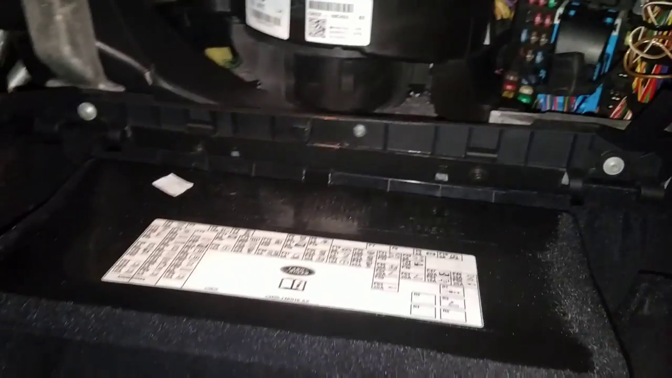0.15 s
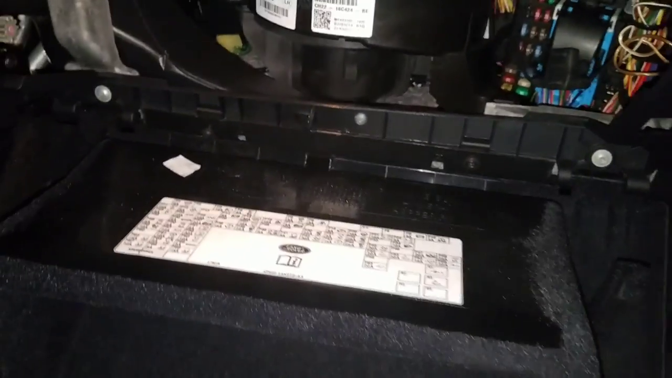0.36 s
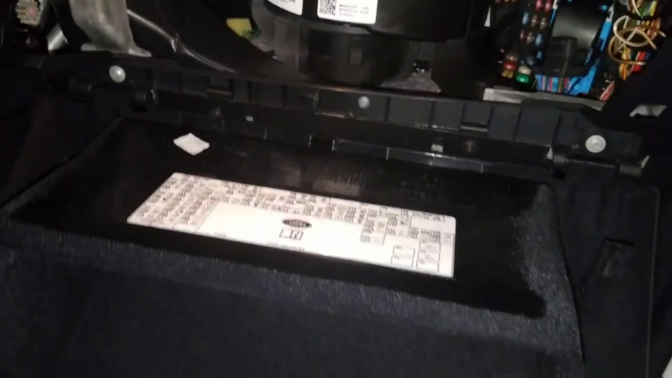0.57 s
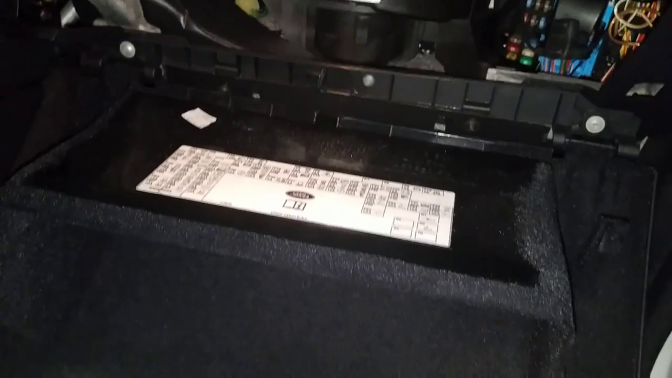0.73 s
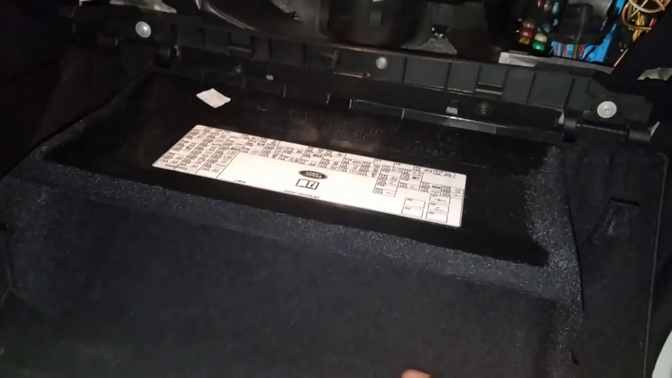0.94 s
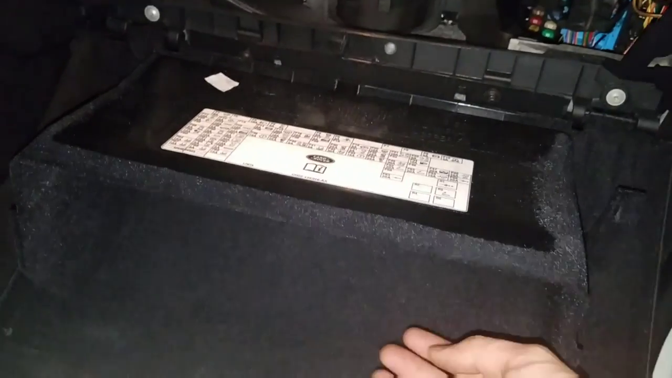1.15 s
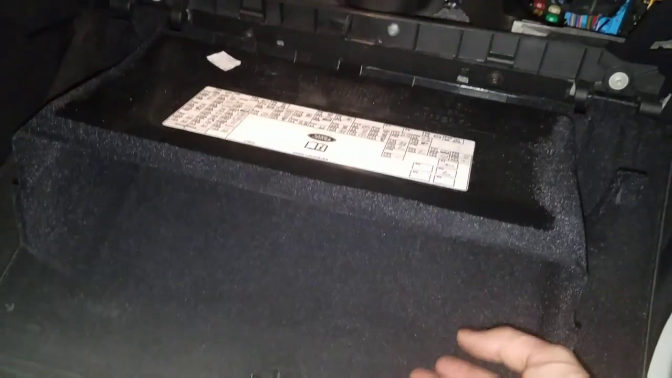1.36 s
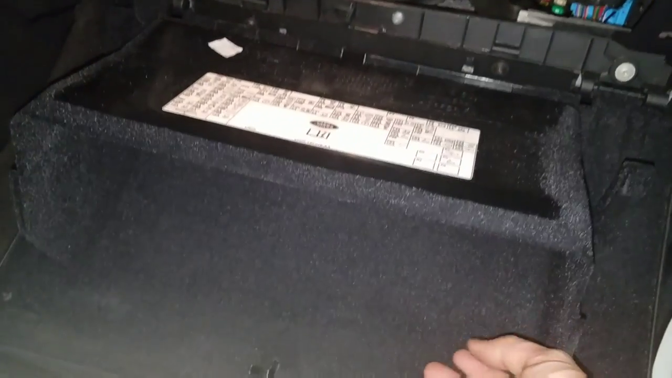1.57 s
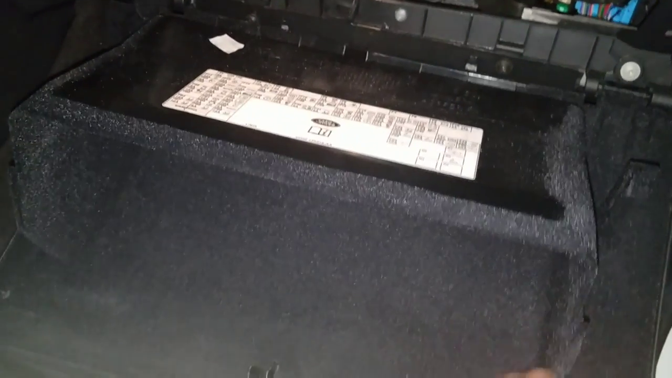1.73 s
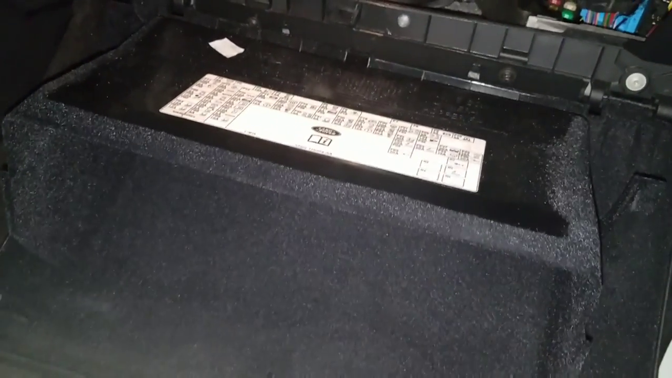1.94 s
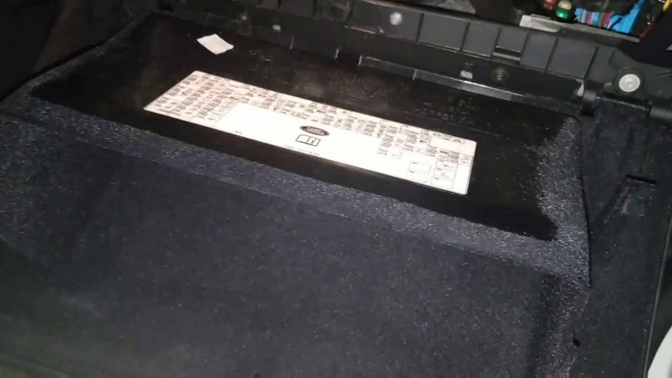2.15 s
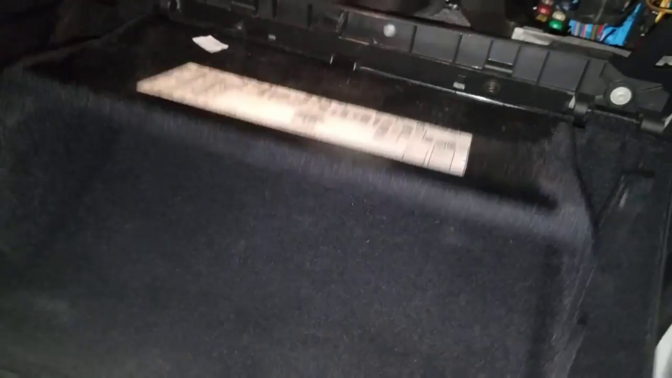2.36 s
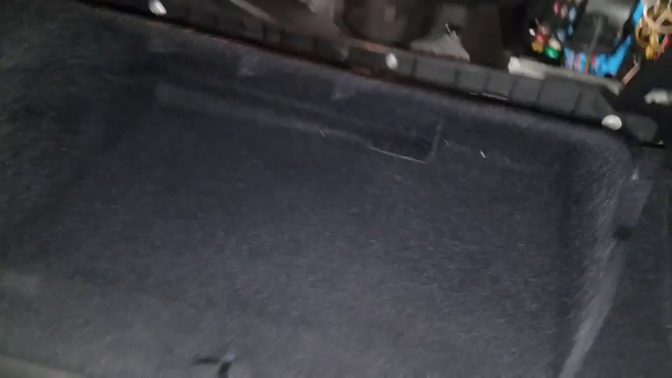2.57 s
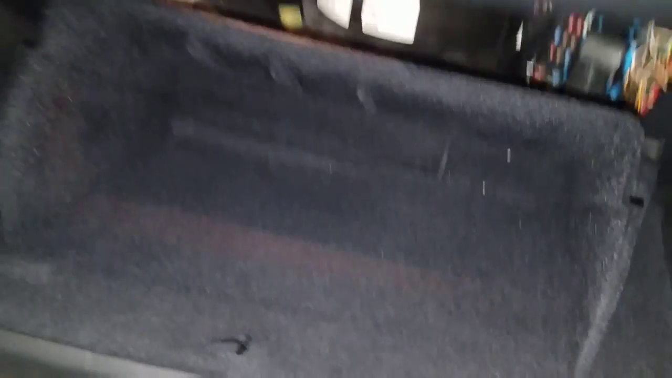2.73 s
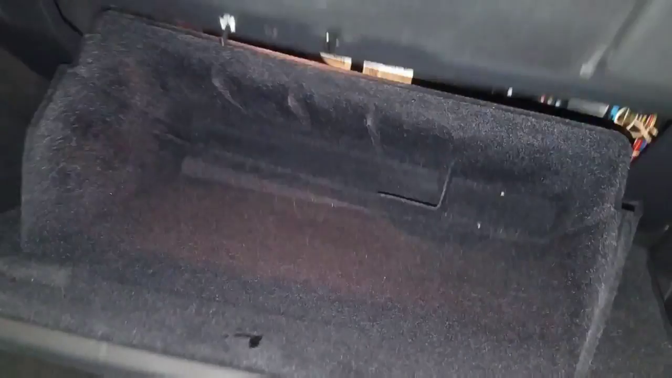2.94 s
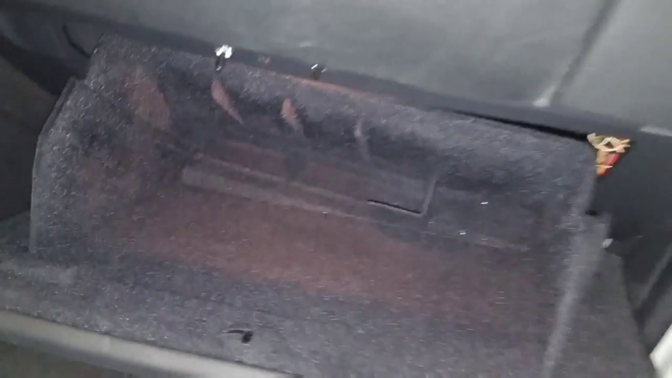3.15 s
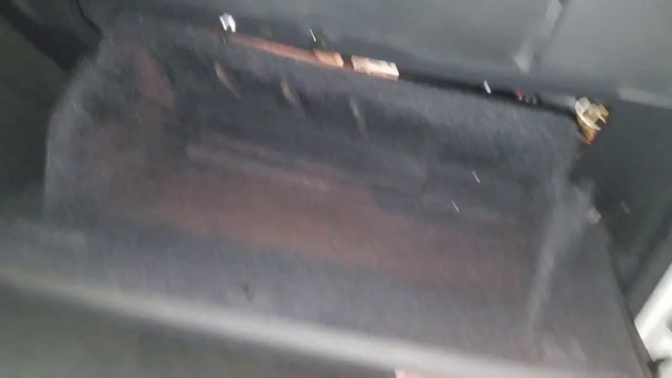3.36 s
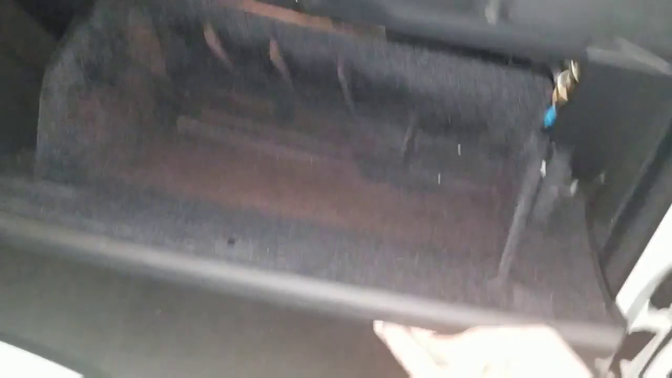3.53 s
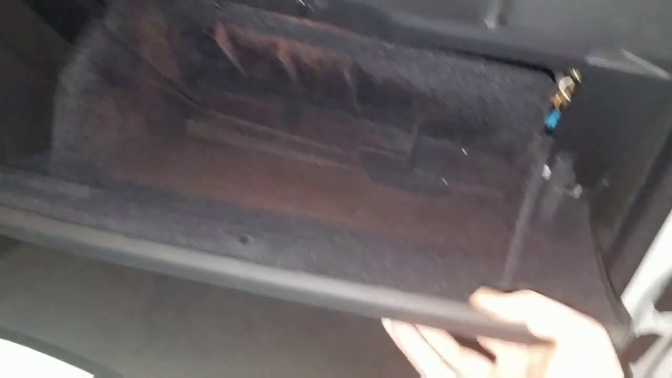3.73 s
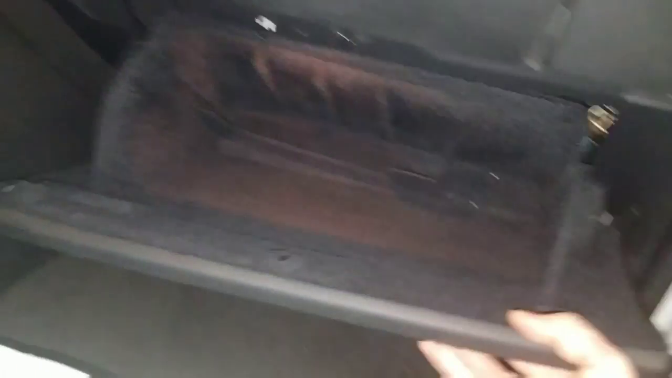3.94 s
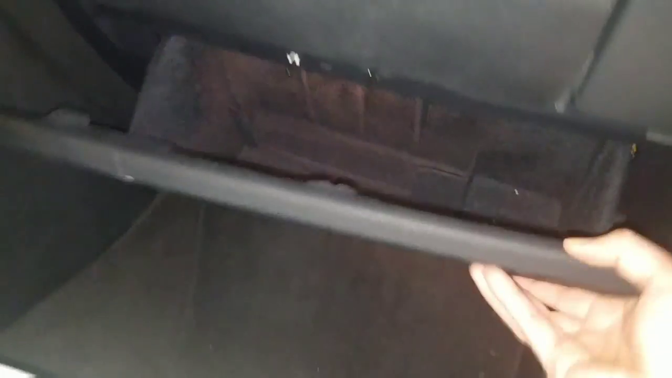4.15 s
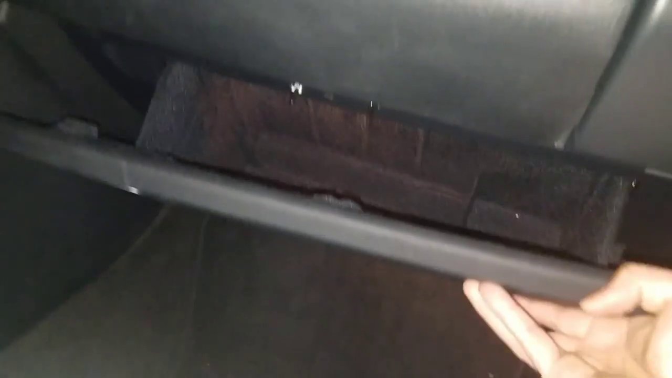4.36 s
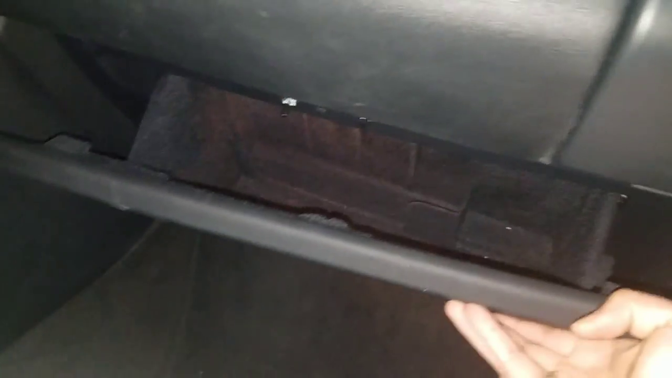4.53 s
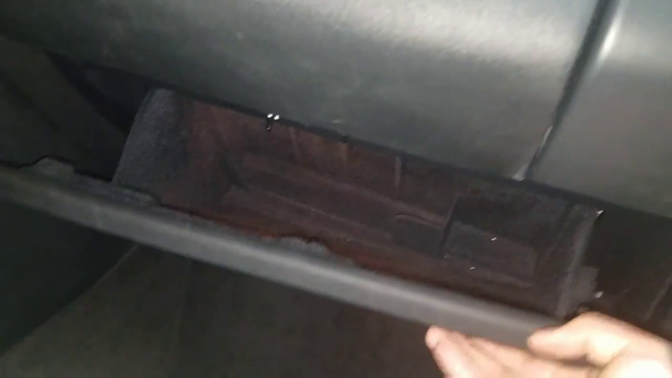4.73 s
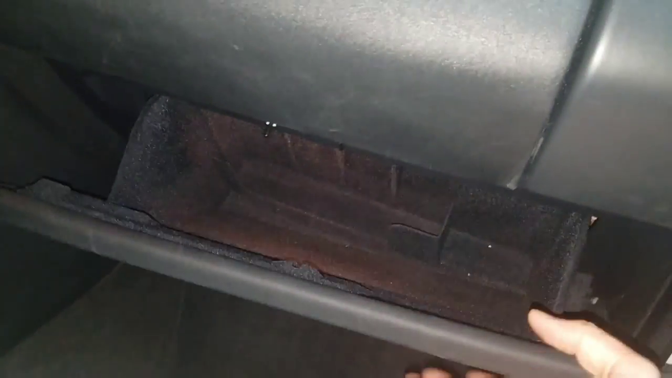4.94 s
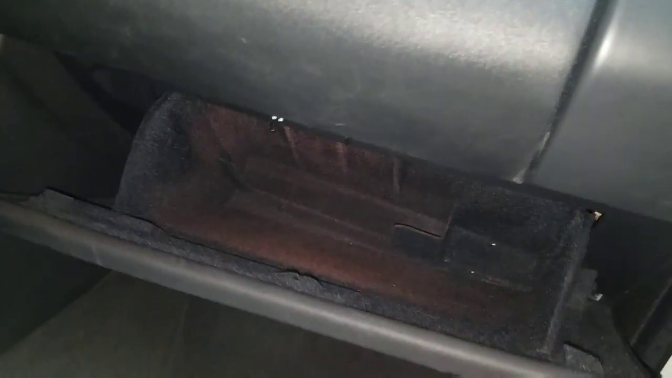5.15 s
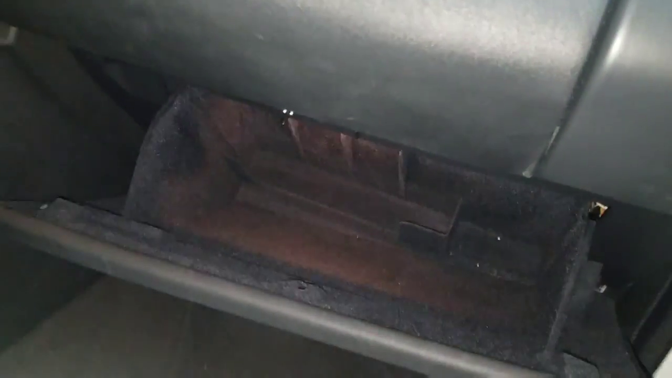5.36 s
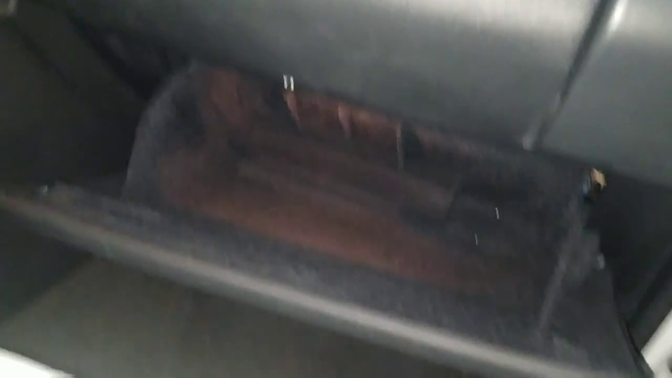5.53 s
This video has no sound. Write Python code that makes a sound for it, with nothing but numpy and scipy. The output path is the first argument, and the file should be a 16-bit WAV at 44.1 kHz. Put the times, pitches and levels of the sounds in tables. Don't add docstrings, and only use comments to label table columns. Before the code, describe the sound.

A sleeve brushes in grainy bursts for two seconds over faint air and hiss. A glove box bin is swung up: dull bumps, a sharp hollow knock, booming felt rubs, then quick thuds and a very loud plastic crack past its stops, with a short frame hum. The nearby microphone flattens and ducks the cabin air. Afterwards come a tiny tick, soft sliding and a last nudge.

```python
import sys
import numpy as np
from scipy import signal
from scipy.fft import rfft, irfft, next_fast_len
from scipy.io import wavfile
from scipy.ndimage import uniform_filter1d

SR = 44100
rng = np.random.default_rng(int(sys.argv[2]) if len(sys.argv) > 2 else 0)


def magnitude_from_level(level_db):
    exponent = np.asarray(level_db, float) / 20
    return 10 ** exponent


def materialize(psi):
    bounded = np.clip(np.atleast_2d(psi).T, -1, 1)
    quanta = np.round(bounded * 32767).astype(np.int16)
    wavfile.write(sys.argv[1], SR, quanta)


N = 251059
TIME_S = np.arange(N) / SR

# mode_hz, level_db, t60_s
BIN_MODES = [(180, -7, .27), (273, 1, .22), (305, -1, .15), (369, -10, .2), (439, -4, .12), (533, -12, .09),
             (707, -4, .14), (777, -11, .14), (853, -15, .13), (930, -21, .12), (1290, -17, .14),
             (1529, -16, .16), (1880, -15, .12), (1956, -17, .14), (2257, -14, .14)]
# freq_hz, correlation
NEAR_LIKENESS = [(60, .995), (150, .99), (300, .93), (640, .7), (1400, .1), (3000, 0)]
# freq_hz, correlation
FAR_LIKENESS = [(60, .93), (150, .6), (380, .36), (950, .03), (1400, 0.0)]
# start_s, knock_db, thud_re_knock_db, snap_re_knock_db, pitch_hz, ring_re_60ms_db
SLAM_BLOWS = [
    (4.1655, 2.5, -13, -13.5, 2150, 2),
    (4.191, -20, 8, -19, 719, 5),
]


def unit(x):
    return x / np.sqrt(np.mean(x ** 2) + 1e-20)


def along(points, hz):
    point_hz, value = np.transpose(points)
    return np.interp(np.log(hz + 1), np.log(point_hz + 1), value)


def timed(points):
    return np.interp(TIME_S, *np.transpose(points))


def strokes(rows):
    peak_s, peak_db, rise_s, fall_s = np.transpose(rows)[:4, :, None]
    late_s = TIME_S - peak_s
    return peak_db - 20 * np.maximum(-late_s / rise_s, late_s / fall_s)


def summed(db):
    return uniform_filter1d(np.sqrt(np.sum(magnitude_from_level(2 * db), axis=0)), size=221)


def filtered(x, response):
    count = x.shape[-1]
    size = next_fast_len(count + SR // 2)
    spectrum = rfft(x, size) * response(np.fft.rfftfreq(size, 1 / SR))
    return irfft(spectrum, size)[..., :count]


def registers(hz):
    deep, low, high = [1 / (1 + (hz / edge_hz) ** 10) for edge_hz in (110, 500, 2800)]
    return low - deep, high - low, 1 - high, deep


def bump(hz, centre_hz, width, db):
    return magnitude_from_level(db / (1 + (np.log((hz + 1) / centre_hz) / width) ** 2))


def bandpass(hz, centre_hz, width_hz):
    loss = 1j * hz * width_hz
    return loss / (centre_hz * centre_hz - hz * hz + loss)


def pair(two, spectrum, alike):
    def mid_side(hz):
        turn = np.arccos(np.clip(along(alike, hz), -1, 1)) / 2
        return magnitude_from_level(along(spectrum, hz)) * [np.cos(turn), np.sin(turn)]

    mid, side = filtered(two, mid_side)
    return np.array([mid + side, mid - side])


def patchy(depth_db, pitch_hz=1000 + np.zeros(N), width=.15, peak_db=0):
    hz, frame_s, z = signal.stft(rng.standard_normal((2, N)), SR, nperseg=512)
    field = uniform_filter1d(rng.standard_normal(z.shape[1:]), size=4, axis=0)
    field = uniform_filter1d(field, size=6, axis=1)
    peak = bump(hz[:, None], np.interp(frame_s, TIME_S, pitch_hz), width, peak_db)
    return signal.istft(z * peak * magnitude_from_level(depth_db * unit(field)), nperseg=512)[1][:, :N]


def grit(rate_hz, spread_db, life_s):
    slips = (rng.random(N) < rate_hz / SR) * magnitude_from_level(spread_db * rng.exponential(size=N))
    return 1 + signal.lfilter([1], [1, -np.exp(-1 / (life_s * SR))], slips)


def cabin():
    # freq_hz, level_db_per_hz
    quiet_colour = [(12, -31.5), (20, -2), (27, -21), (44, -9), (64, -2), (125, -5), (195, -15), (300, -10),
                    (370, -17), (825, -22.5), (1400, -23), (8890, -37), (14000, -29.5), (16000, -40.5)]
    quiet_db, stir_db, stir_s, stir_wide_s = -65, 6, 3.5, .25
    sink_s, spring_s, creep_s = .635, .15, .74
    slam_s = SLAM_BLOWS[0][0]
    duck_db = np.interp(TIME_S - slam_s, np.cumsum([0, sink_s, spring_s, creep_s]), [1.5, -13, -3.5, .6])
    stirred_db = stir_db * np.exp(-((TIME_S - stir_s) / stir_wide_s) ** 2)
    air = unit(pair(patchy(depth_db=1.3), quiet_colour, FAR_LIKENESS))
    return magnitude_from_level(quiet_db + np.where(TIME_S > slam_s, duck_db, stirred_db)) * air


def sleeve():
    # peak_s, rustle_db, rise_s, fall_s_per_20db, fizz_re_rustle_db
    rustle_rows = [(.152, -61.5, .13, .03, -5), (.312, -58.5, .09, .05, -7), (.75, -66, .05, .2, -8),
                   (.83, -60, .2, .07, -9), (1.345, -64, .02, .2, -10), (1.39, -62, .12, .06, -8),
                   (1.54, -60, .006, .15, -8), (1.574, -58, .05, .08, -6), (1.665, -59, .03, .2, -5),
                   (1.73, -60, .2, .05, -4), (1.815, -57.5, .12, .1, -2), (1.87, -59, .15, .05, 1),
                   (1.9, -60, .1, .025, -6)]
    # time_s, pitch_hz
    fold_pitch = [(0, 680), (.3, 820), (.8, 940), (1.4, 960), (1.55, 1030), (1.9, 1000)]
    # freq_hz, level_db_per_hz
    cloth_colour = [(120, -43), (340, 1), (1000, -3.5), (2200, -5), (4500, -15), (9000, -20.5),
                    (13000, -16.5), (16500, -21)]
    db = strokes(rustle_rows)
    body_gain = summed(db)
    fizz_gain = summed(db + np.array(rustle_rows)[:, 4:])
    fibres = patchy(2.2, timed(fold_pitch), width=.12, peak_db=9)
    fibres = fibres * grit(rate_hz=1200, spread_db=1.9, life_s=.001)
    cloth = pair(fibres, cloth_colour, FAR_LIKENESS)
    fizz = filtered(cloth, lambda hz: registers(hz)[2])
    return body_gain * unit(cloth - fizz) + fizz_gain * unit(fizz)


def dying(t60_s, count):
    hz, frame_s, z = signal.stft(rng.standard_normal((2, count)), SR, nperseg=256)
    decay = magnitude_from_level(-60 * frame_s / t60_s(hz)[:, None])
    return signal.istft(z * decay, SR, nperseg=256)[1][:, :count]


def contact(row, ring_db, ring, scatter_db, tail_db):
    # freq_hz, level_db_per_hz
    shell_colour = [(20, -40.5), (50, -18), (170, -4.5), (300, -1.5), (550, -14.5), (750, -7.5),
                    (1100, -15), (2200, -15), (3300, -27), (6000, -30), (9000, -33), (13000, -31.5),
                    (16500, -38.5)]
    # freq_hz, t60_s
    cabin_t60 = [(50, 0.7), (200, 0.36), (500, 0.13), (1000, .17), (2100, 0.13), (3500, .17), (12000, 0.15)]
    # freq_hz, left_over_right_db
    side_tilt = [(100, .7), (500, 5), (1000, 2.5), (2000, -7), (4000, 1.1), (9000, 4.5)]
    _, knock_db, thud_db, snap_db, pitch_hz, length_db = row
    t = np.arange(SR // 2) / SR

    def shell_t60(hz):
        return .06 * magnitude_from_level(length_db) * along([(100, 2.84), (700, 0.99), (2000, .7), (8000, 0.55)], hz)

    def panel(hz):
        return bump(hz, pitch_hz, .12, 10) * bump(hz, 1.95 * pitch_hz, 0.061, 3.8)

    burst = dying(shell_t60, len(t))
    burst = burst + magnitude_from_level(tail_db) * dying(lambda hz: along(cabin_t60, hz), len(t))
    body = filtered(pair(burst, shell_colour, NEAR_LIKENESS), panel) * (1 - np.exp(-t / 0.00082))
    body = body / np.abs(body).max()
    luck_rows = rng.standard_normal((len(BIN_MODES), 3))
    for (hz, level_db, t60_s), (detune, luck, start) in zip(BIN_MODES, luck_rows):
        apart = np.arccos(np.clip(along(NEAR_LIKENESS, hz), -1, 1)) * np.array([[.5], [-.5]])
        drift = np.cumsum(rng.standard_normal(len(t))) * .012
        mode_hz = hz * (1 + .004 * scatter_db * detune)
        swing = np.sin(2 * np.pi * (mode_hz * t + start) + apart + drift)
        mode_db = ring_db + level_db + scatter_db * luck
        body = body + magnitude_from_level(mode_db - 60 * t / (t60_s * ring)) * (1 - np.exp(-t / 0.006)) * swing
    low, mid, high, deep = [filtered(body, lambda hz: registers(hz)[k]) for k in range(4)]
    gains = magnitude_from_level([knock_db + thud_db, knock_db, knock_db + snap_db])
    parts = (low + .4 * deep, mid, high)
    blow = sum(gain * part / np.abs(part).max(axis=1)[:, None] for gain, part in zip(gains, parts))
    return magnitude_from_level(2.5) * filtered(blow, lambda hz: magnitude_from_level(np.outer([.5, -.5], along(side_tilt, hz))))


def knocks():
    # start_s, knock_db, thud_re_knock_db, snap_re_knock_db, pitch_hz
    knock_rows = [(1.085, -75, -10, 16, 1900), (1.741, -50, -10, 10, 2820), (2.029, -76, 1, -9, 732),
                  (2.295, -50, 16, 3, 690), (2.381, -44.5, -3, 4.5, 2670), (2.429, -46, -1, -8, 697),
                  (2.766, -58.5, 11.5, -16, 549), (2.898, -52.5, -5, -24, 1210),
                  (3.102, -31, -3, -9.5, 740), (3.129, -52, 0, 18, 2500), (3.1495, -18, -9, -0.5, 1030),
                  (3.498, -41, -15, -13, 580), (3.555, -30, -10.5, -30, 883), (3.609, -58, 3.5, -17, 686),
                  (3.829, -34, -3.5, -15, 546), (4.026, -47, -3, -12, 1400),
                  (4.058, -41, 4.5, -18.5, 629.6), (4.085, -28, 3, -19, 501), (4.111, -18, -6, -26.5, 810),
                  (4.133, -25, -3, -12, 1380), (4.772, -85, -10, 17, 2500), (4.95, -85, -10, 16, 2500),
                  (5.66, -61.5, 2.5, -10, 676)]
    damped_db = -1
    out = np.zeros((2, N + SR))
    for row in knock_rows:
        blow = contact((*row, damped_db), ring_db=-10, ring=.6, scatter_db=6.5, tail_db=-25)
        out[:, round(row[0] * SR):][:, :blow.shape[1]] += blow
    return out[:, :N]


def shudder():
    # peak_s, level_db, rise_s, fall_s_per_20db
    sway_rows = [(2.34, -43, .07, .05), (2.444, -45, .065, .07), (2.54, -62, .1, .3), (2.67, -64, .2, .2),
                 (2.8, -60, .08, .04), (3.0, -70, .2, .2), (3.15, -50, .08, .25), (3.36, -60, .3, .2),
                 (3.59, -50, .1, .12), (3.84, -39, .08, .13), (3.99, -59, .2, .1), (4.055, -44, .03, .2),
                 (4.09, -35, .04, .1), (4.17, -38, .1, .2), (4.2, -38, .05, .1), (4.37, -57, .2, .12),
                 (4.5, -69, .06, .15), (5.675, -63, .07, .3)]
    sway_at_55db_hz, stiffens_hz_per_db = 76, 1.2
    level = summed(strokes(sway_rows))
    level_db = 20 * np.log10(abs(level) + 1e-9)
    sway_hz = np.clip(sway_at_55db_hz + stiffens_hz_per_db * (level_db + 55), 55, 98)
    hz, frame_s, z = signal.stft(rng.standard_normal((2, N)), SR, nperseg=4096)
    peak = bump(hz[:, None], np.interp(frame_s, TIME_S, sway_hz), .25, 14)
    sway = signal.istft(z * peak * registers(hz)[3][:, None], nperseg=4096)[1][:, :N]
    return level * unit(pair(sway, [(15, -30), (30, -0.5), (150, 0.5)], NEAR_LIKENESS))


def resonance(hz, damping):
    return 1 + sum(1.9 * bandpass(hz, mode_hz, damping / t60_s) for mode_hz, _, t60_s in BIN_MODES)


def rubbing():
    # peak_s, scrape_db, rise_s,
    # fall_s_per_20db, boom_re_scrape_db
    rub_rows = [(2.404, -62, .02, .2, 12), (2.436, -51, .07, .055, -6), (2.545, -53.5, .025, .12, -5),
                (2.586, -57, .2, .08, -2), (2.68, -68, .3, .3, 2), (2.78, -63, .03, .1, 8),
                (2.84, -68, .1, .1, 9), (2.896, -64, .03, .15, -3), (3.04, -69, .15, .05, 4),
                (3.102, -38, .016, .08, 4), (3.135, -41, .04, .03, 8), (3.18, -48, .01, .06, 7),
                (3.225, -59, .08, .07, 7), (3.336, -62, .018, .2, 10), (3.436, -50, .13, .08, -2),
                (3.52, -48, .02, .1, -4), (3.568, -29, .045, .035, -9), (3.61, -56, .05, .045, 14),
                (3.69, -67, .1, .1, 6), (3.77, -60, .07, .1, -2), (3.845, -41, .065, .035, 9),
                (3.88, -62, .06, .11, 19),
                (4.056, -47, .018, .1, 9),
        (4.114, -31, .045, .08, 8),
        (4.152, -36, .04, .012, 11),
    ]
    settling_rows = [
        (4.9, -68, .03, .08, -15),
        (5.146, -68, .33, .27, -8),
        (5.32, -70, .07, 1, -6),
        (5.6, -72, 1, .04, -5),
        (5.674, -62, .024, .04, 9),
    ]
    # time_s, pitch_hz
    contact_pitch = [(2.44, 720), (2.6, 665), (2.8, 590), (2.9, 1100), (3.0, 720), (3.2, 615), (3.34, 770),
                     (3.44, 1120), (3.55, 880), (3.59, 580), (3.8, 620), (4.06, 645), (4.14, 820),
                     (5.15, 730)]
    # freq_hz, level_db_per_hz
    felt_colour = [(20, -40), (60, -10), (160, -1.5), (450, -10), (1000, -9), (2500, -13.5), (5000, -23.5),
                   (9000, -28.5), (13000, -28.5), (16500, -33)]
    firm_db, hiss_re_firm_db, hiss_growth = -50, -9.5, .76
    rows = rub_rows + settling_rows
    db = strokes(rows)
    scrape_gain = summed(db)
    boom_gain = summed(db + np.array(rows)[:, 4:])
    hiss_gain = magnitude_from_level(firm_db + hiss_re_firm_db) * abs(scrape_gain / magnitude_from_level(firm_db)) ** hiss_growth
    slips = patchy(2.5, timed(contact_pitch), width=.12, peak_db=8)
    slips = slips * grit(rate_hz=1200, spread_db=1.7, life_s=.0015)
    body = pair(slips, felt_colour, NEAR_LIKENESS)
    boom, scrape, hiss = [unit(filtered(body, lambda hz: registers(hz)[k])) for k in range(3)]
    driven = boom_gain * boom + scrape_gain * scrape
    return magnitude_from_level(-7) * filtered(driven, lambda hz: resonance(hz, damping=6.8)) + hiss_gain * hiss


def slam():
    # mode_hz, width_hz, level_db
    frame_modes = [(720, 120, -3), (880, 140, -3), (1280, 200, -5), (1580, 240, -3.5), (1980, 320, -1),
                   (2290, 200, -6)]
    out = np.zeros((2, N + SR))
    for row in SLAM_BLOWS:
        blow = contact(row, ring_db=-5.5, ring=1.0, scatter_db=-1, tail_db=-18.5)
        out[:, round(row[0] * SR):][:, :SR // 2] += blow

    def frame(hz):
        modes = sum(magnitude_from_level(db) * bandpass(hz, mode_hz, width_hz) for mode_hz, width_hz, db in frame_modes)
        return abs(modes) ** 2.1

    t = np.arange(SR) / SR
    hum_db, hum_t60_s = -35.5, .63
    hum = unit(filtered(rng.standard_normal((2, SR)), frame)) * magnitude_from_level(hum_db - 60 * t / hum_t60_s)
    out[:, round(SLAM_BLOWS[0][0] * SR):][:, :SR] += hum
    return out[:, :N]


def catch():
    # mode_hz, level_db, t60_s
    catch_modes = [(713, -8, 0.12), (950, 2.5, 0.071), (1114, -7.5, 0.076), (1764, 4.5, 0.05),
                   (1900, -9, .04), (2350, -17, .03), (2950, -14, 0.029)]
    start_s, level_db = 4.858, -43.5
    t = np.clip(TIME_S - start_s, 0, None)
    ring = np.zeros((2, N))
    for hz, db, t60_s in catch_modes:
        waver = np.cumsum(rng.standard_normal((2, N)), axis=1) * .045
        ring += magnitude_from_level(db - 60 * t / t60_s) * np.sin(2 * np.pi * hz * t + waver)
    return magnitude_from_level(level_db) * (1 - np.exp(-t / 0.001)) * ring


def scene():
    # pitch_hz, width_share, gain_db
    hollow_rows = [(125, .1, -8), (222, .09, -13)]

    def footwell(hz):
        return magnitude_from_level(.6) * np.prod([bump(hz, *row) for row in hollow_rows], axis=0)

    bin_sound = filtered(knocks() + rubbing() + slam(), footwell)
    return cabin() + sleeve() + shudder() + bin_sound + catch()


def top_cut(x):
    return signal.sosfilt(signal.butter(12, 16460, fs=SR, output="sos"), x)


def record(dry):
    clipped = dry / (1 + np.abs(dry / .98) ** 6) ** (1 / 6)
    limited = .96 * filtered(clipped, lambda hz: 1 / (1 + (hz / 16000) ** 80))
    return top_cut(limited)


dry = scene()
out = record(dry)
materialize(out)
```